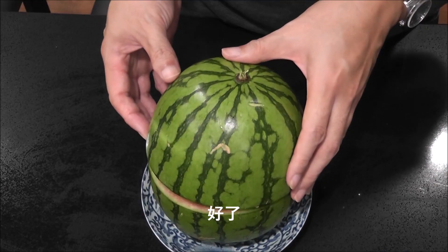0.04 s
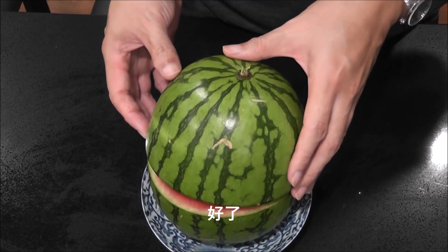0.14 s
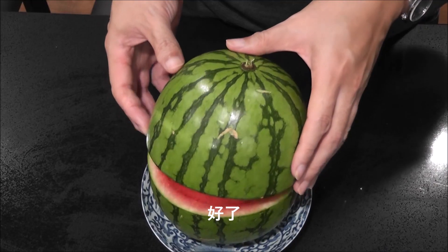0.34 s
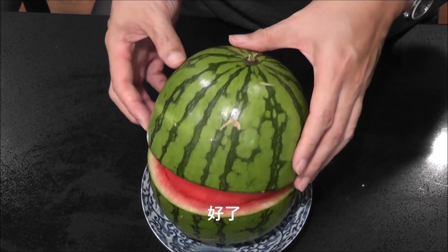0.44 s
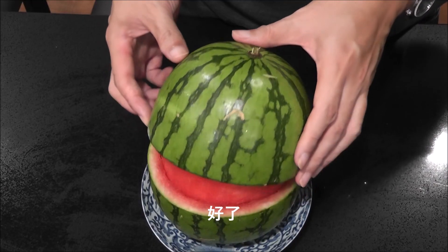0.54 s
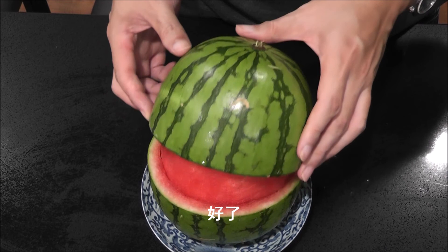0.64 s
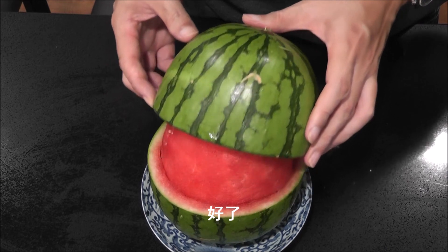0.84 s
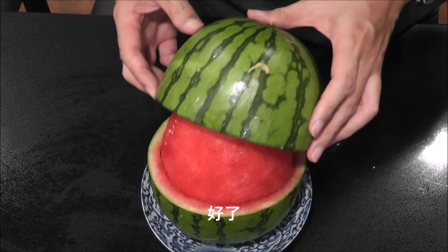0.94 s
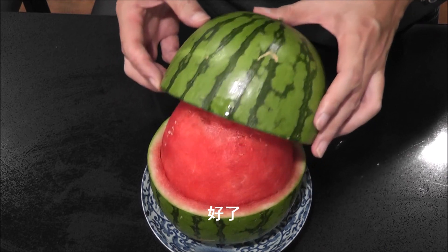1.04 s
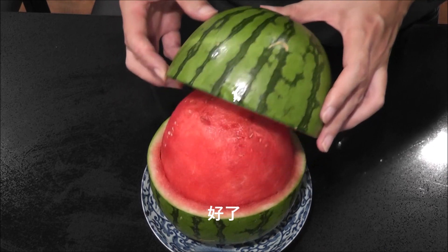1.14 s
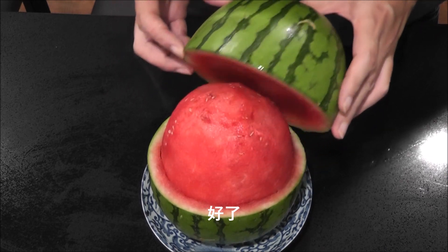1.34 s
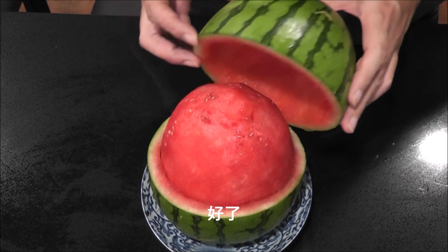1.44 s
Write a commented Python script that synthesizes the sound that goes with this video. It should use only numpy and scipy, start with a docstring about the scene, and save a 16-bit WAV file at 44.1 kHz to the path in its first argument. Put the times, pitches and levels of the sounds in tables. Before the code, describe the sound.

In a small echoing room, air sips through a cut watermelon and the rind lets go with two hollow, wet thumps. Then come scattered juicy ticks, soft finger bumps and the light rustle of rind sliding over flesh.

```python
"""Two hollow thumps of suction letting go, as a watermelon's rind cap is pulled off its domed flesh.
Air first sips through the wet seam; then each release cracks the juice film and rings the hollow under
the rind. Threads of juice snap in bright ticks, fingers bump softly, and the rind rustles over the flesh
as it lifts away. It all plays on a plate in a small, hard, ringing room, over a faint bed of air."""
import sys
import numpy as np
from scipy import signal
from scipy.fft import rfft, irfft
from scipy.io import wavfile

SR = 44100
rng = np.random.default_rng(int(sys.argv[2]) if len(sys.argv) > 2 else 0)


def digitize_waveform(pressure):
    """Quantize a signal to 16-bit integers and store it at the path in sys.argv[1].

    Rows of a 2-D input are taken as channels; values are limited to [-1, 1].
    """
    field = np.atleast_2d(pressure).T
    bounded = np.clip(field, -1, 1)
    quanta = np.round(bounded * 32767).astype(np.int16)
    wavfile.write(sys.argv[1], SR, quanta)


N = 66150

# Fader rides for air sipping through the seam, rind sliding on wet flesh and hands shifting their grip.
# Each row: time in seconds, level in dB.
SIP_RIDE = [(0, -41.5), (.06, -55), (.12, -50.5), (.15, -40), (.188, -33), (.212, -32), (.235, -34.5),
            (.30, -38), (.35, -39), (.41, -35), (.48, -46.5), (.58, -54.5), (.72, -68), (.9, -75)]
SLIDE_RIDE = [(0, -56), (.085, -51.5), (.13, -52), (.21, -42.5), (.3, -52.5), (.64, -56), (.70, -51),
              (.77, -58.5), (.80, -56), (.92, -62.5), (.97, -55.5), (1.05, -48.5), (1.10, -50),
              (1.17, -53.5), (1.23, -44), (1.285, -39.5), (1.36, -51.5), (1.5, -62)]
GRIP_RIDE = [(0, -40.5), (.07, -54.5), (.13, -43), (.2, -43.5), (.6, -51), (.75, -55), (.92, -59.5),
             (1.01, -51.5), (1.1, -56), (1.215, -53.5), (1.25, -46), (1.32, -52.5), (1.5, -61)]
# Fingers and rind bumping softly. Each row: start in seconds, level in dB, pitch ratio.
SOFT_BUMPS = [(.013, -33.5, 0.96), (0.989, -46, 1.3), (1.23, -42.5, 1.05), (1.248, -43, 1.35)]
# The hollow under the rind. Each row: base pitch in Hz, level in dB, seconds to fade by 60 dB.
HOLLOW_MODES = [(184.6, -21.5, .196), (213, -16, .176), (279, -4, 0.19), (356, -5, 0.067),
                (497, -11.5, 0.096), (568, -11, 0.11), (660.4, -10.5, 0.06), (705, -27, 0.054),
                (900, -14, 0.029), (947, -17.5, 0.043), (1348, -24, .05), (2060, -21, 0.085)]
# The room's standing waves. Each row: pitch in Hz, level in dB.
STANDING_WAVES = [(187.5, -17), (227.5, -24), (254, -24), (380, -17.5), (475.7, -20), (511, -26.5),
                  (552, -21)]
# Juice threads snapping. Each row: start in seconds, level in dB.
JUICE_SNAPS = [(0.084, -29), (0.666, -28.5), (.691, -23.5), (.698, -35), (.7895, -28), (0.797, -27.5),
               (1.029, -32), (1.049, -27), (1.089, -26), (1.205, -27), (1.251, -26), (1.279, -23)]
# Suction letting go in two clusters. Each row: start in seconds, thump level in dB, pitch ratio,
# push length in seconds, wet crack level in dB.
RELEASES = [(0.2033, -10, 1.03, 0.00013, -22.5), (0.2074, -14, .978, 0.0003, -26),
            (0.2109, -21.5, .973, 0.00055, -20.5), (0.2168, -9, .934, 0.00028, -28),
            (0.2392, -18.5, .983, 0.00039, -40), (0.3719, -11.5, .924, 0.0012, -41),
            (0.376, -18.5, 1.0, 0.0023, -39), (0.3807, -12.6, 1.031, .0007, -43),
            (0.4058, -20.5, .988, 0.00075, -33.5)]
# Tone curves that colour each layer. Each row: frequency in Hz, relative level in dB.
SIP_EQ = [(60, -39), (200, -19), (450, -6.5), (700, 7), (1100, 2.5), (1600, 1), (2150, 1), (2520, -6.5),
          (3000, -3), (5000, -12), (9000, -18), (15000, -27)]
SLIDE_EQ = [(60, -34), (300, -14), (900, -4), (2000, -1), (2520, -2.5), (3000, -1), (5300, 0), (7500, -5),
            (10000, -5.5), (15000, -16.5)]
GRIP_EQ = [(40, -44), (100, -12), (160, -16.5), (195, 1), (240, -4), (290, -2), (400, 0), (600, -7),
           (1000, -13), (2500, -30), (8000, -41)]
AIR_EQ = [(25, -21), (45, -17), (62, -0.5), (80, -14), (115, 2.5), (160, -4.5), (197, 4.5), (240, -1),
          (450, -4.5), (1000, -11.5), (4000, -16.5), (9000, -21), (15000, -40)]
TICK_EQ = [(800, -10), (3000, -4), (5500, -3.5), (10000, 0), (15000, -10)]
CRACK_EQ = [(40, -16), (120, 3.5), (500, 4), (1000, 8.5), (2000, 0.5), (2550, -1.5), (3200, -1),
            (4200, -5.5), (6000, -6), (10000, -10.5), (15000, -23)]
# The room's decay. Each row: frequency in Hz, seconds to fade by 60 dB.
ROOM_DECAY = [(100, .55), (300, 0.46), (1000, 0.8), (4000, 0.49), (14000, 0.42)]
# Stereo width of diffuse sound. Each row: frequency in Hz, side level in dB.
STEREO_WIDTH = [(30, -14), (70, -11), (120, -6), (250, -12), (600, -9), (1400, -8), (2500, -9), (4500, -18),
                (8000, -45), (11000, -5.5), (15000, 2)]
# Early slaps off the walls. Each row: delay in seconds, gain (negative flips the polarity).
WALL_SLAPS = [(0.0294, -0.14), (.0365, 0.16), (.0787, 0.23)]

GRAINS_PER_S, GRAIN_SPREAD_DB, RUSTLE_WIDTH_DB = 3500, 3.0, -3.5
BUMP_PUSH_S, CRACK_DECAY_S, LOW_CUT_HZ = 0.0012, 0.0038, 162
SPATTER_DB, SPATTER_DECAY_S, SPATTER_PER_S = -10.5, 0.025, 1000
KNOCK_PAN_DB, RIGHT_LAG_S = -1.9, 0.00009
KNOCK_SEND_DB, CRACK_SEND_DB, ROOM_BUILD_S, STANDING_T60_S = -6, -4.5, 0.011, 0.5
AIR_DB, HIGH_CUT_HZ = -55, 15700
TIME, FREQS = np.arange(N) / SR, np.fft.rfftfreq(N, 1 / SR)


def undb(db):
    """Decibels to gain."""
    return 10 ** (np.asarray(db) / 20)


def at_hz(curve, hz):
    """Read a curve on a log-frequency axis."""
    freqs, values = np.array(curve).T
    return np.interp(np.log(np.maximum(hz, 1)), np.log(freqs), values)


def convolve(x, response):
    """Play a sound through a response, trimmed to the scene's length."""
    return signal.fftconvolve(x, response)[:N]


def equalise(x, curve, size=4096):
    """Colour a sound with a minimum-phase filter of unit energy, so attacks have no pre-ring."""
    gains = undb(at_hz(curve, np.fft.rfftfreq(size, 1 / SR)))
    cepstrum = irfft(np.log(gains))
    cepstrum[1:size // 2] *= 2
    cepstrum[size // 2 + 1:] = 0
    response = irfft(np.exp(rfft(cepstrum)))
    return convolve(x, response / np.linalg.norm(response))


def delay(x, seconds):
    """Slide a sound later in time."""
    return np.interp(np.arange(N) - seconds * SR, np.arange(N), x, left=0)


def pan(x, db):
    """Place a sound, left minus right in dB."""
    return x * undb(np.array([[db], [-db]]) / 2)


def widen(x):
    """Shape a sound into a side signal, opposite in left and right."""
    side = irfft(rfft(x) * undb(at_hz(STEREO_WIDTH, FREQS)), N)
    return np.array([side, -side])


def diffuse_noise():
    """Stereo noise arriving from all around."""
    mid, side = rng.standard_normal((2, N))
    return mid + widen(side)


def reverb(x, bands=6):
    """The hard room answers one spot: a fresh diffuse tail blooms, then dies band by band."""
    centres = np.geomspace(ROOM_DECAY[0][0], ROOM_DECAY[-1][0], bands)
    field, tails = rfft(diffuse_noise()), 0
    bloom = 1 - np.exp(-(TIME / ROOM_BUILD_S) ** 2)
    for centre, weights in zip(centres, np.eye(bands)):
        share = at_hz(list(zip(centres, weights)), FREQS)
        decay = np.exp(-np.log(1000) * TIME / at_hz(ROOM_DECAY, centre))
        band = irfft(field * share, N) * decay * bloom
        energy = np.mean(np.sum(band ** 2, axis=1))
        tails = tails + band * np.sqrt(np.mean(share ** 2) / energy)
    return np.array([convolve(x, tail) for tail in tails])


def room_tone():
    """The room's still air: a faint, steady, dark bed."""
    return undb(AIR_DB) * np.array([equalise(channel, AIR_EQ) for channel in diffuse_noise()])


def rustle(ride, curve):
    """Tiny slips and bursting films of uneven size merge into a grainy texture."""
    sizes = undb(GRAIN_SPREAD_DB * np.minimum(rng.exponential(size=N), 5)) * rng.choice([-1, 1], N)
    grains = sizes * (rng.random(N) < GRAINS_PER_S / SR)
    grains /= np.sqrt(np.mean(grains ** 2))
    times, levels_db = np.array(ride).T
    return equalise(grains * undb(np.interp(TIME, times, levels_db)), curve)


def rim_spot():
    """Sipping air, sliding rind and shifting hands at one spot on the rim."""
    return rustle(SIP_RIDE, SIP_EQ) + rustle(SLIDE_RIDE, SLIDE_EQ) + rustle(GRIP_RIDE, GRIP_EQ)


def handling(spots=3):
    """Spots round the rim each reach the room differently; one more, left dry, adds width."""
    rim = 0
    for _ in range(spots):
        spot = rim_spot()
        rim = rim + spot + reverb(spot)
    return rim / np.sqrt(spots) + undb(RUSTLE_WIDTH_DB) * widen(rim_spot())


def ring(modes, pitch, size=32768):
    """Struck resonances ring out as fading sines."""
    t = TIME[:size]
    return sum(undb(db) * np.sin(2 * np.pi * hz * pitch * t) * np.exp(-np.log(1000) * t / t60)
               for hz, db, t60 in modes)


def knock(start, db, pitch, push_s):
    """A short push rings the hollow and the room's standing waves; little deep bass radiates."""
    push = TIME * np.exp(-2 * np.pi * TIME / push_s)  # a longer push sounds duller
    hollow = ring(HOLLOW_MODES, pitch)
    standing = ring([(hz, level, STANDING_T60_S) for hz, level in STANDING_WAVES], pitch=1)
    body = convolve(hollow + standing, push / push.sum())
    low_cut = signal.butter(N=6, Wn=LOW_CUT_HZ, btype="high", fs=SR, output="sos")
    return undb(db) * delay(signal.sosfilt(low_cut, body), start)


def finger_bumps():
    """Fingers and rind bump, softly sounding the hollow."""
    return sum(knock(start, db, pitch, BUMP_PUSH_S) for start, db, pitch in SOFT_BUMPS)


def juice_ticks():
    """Threads of juice snap in bright ticks, each trailing a brief spatter of smaller ones."""
    clicks = np.zeros(N)
    for start, db in JUICE_SNAPS:
        spatter = rng.standard_normal(N) * (rng.random(N) < SPATTER_PER_S / SR)
        snap = undb(SPATTER_DB) * spatter * np.exp(-TIME / SPATTER_DECAY_S)
        snap[0] = 1  # the thread breaks
        onset = int(start * SR)
        clicks[onset:] += undb(db) * snap[:N - onset]
    return equalise(clicks, TICK_EQ)


def suction():
    """Each release pushes the air under the rind for a thump and tears the juice film for a crack."""
    thumps, cracks = 0, 0
    crack_fade = np.exp(-TIME / CRACK_DECAY_S / 2)
    for start, thump_db, pitch, push_s, crack_db in RELEASES:
        thumps = thumps + knock(start, thump_db, pitch, push_s)
        cracks = cracks + undb(crack_db) * delay(rng.standard_normal(N) * crack_fade, start)
    return thumps, equalise(cracks, CRACK_EQ)


def scene():
    """The mix: knocks a touch to the right, wet detail in the centre, the room all around."""
    thumps, cracks = suction()
    knocks = finger_bumps() + thumps
    ticks = juice_ticks()
    direct = pan(np.array([knocks, delay(knocks, RIGHT_LAG_S)]), KNOCK_PAN_DB)
    slaps = sum(gain * delay(knocks, seconds) for seconds, gain in WALL_SLAPS)
    tail = reverb(undb(KNOCK_SEND_DB) * knocks + undb(CRACK_SEND_DB) * cracks + ticks)
    return room_tone() + handling() + direct + ticks + cracks + slaps + tail


def record(dry):
    """A steep high cut shaves the very top off the mix."""
    high_cut = signal.ellip(N=10, rp=0.2, rs=80, Wn=HIGH_CUT_HZ, fs=SR, output="sos")
    return signal.sosfilt(high_cut, dry)


dry = scene()
out = record(dry)
digitize_waveform(out)
```